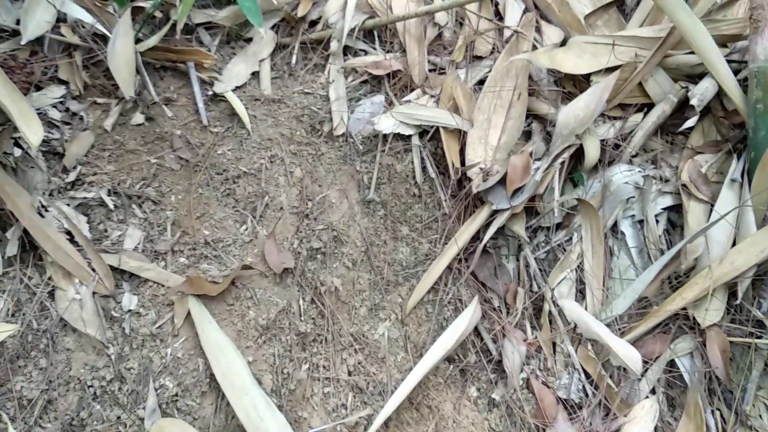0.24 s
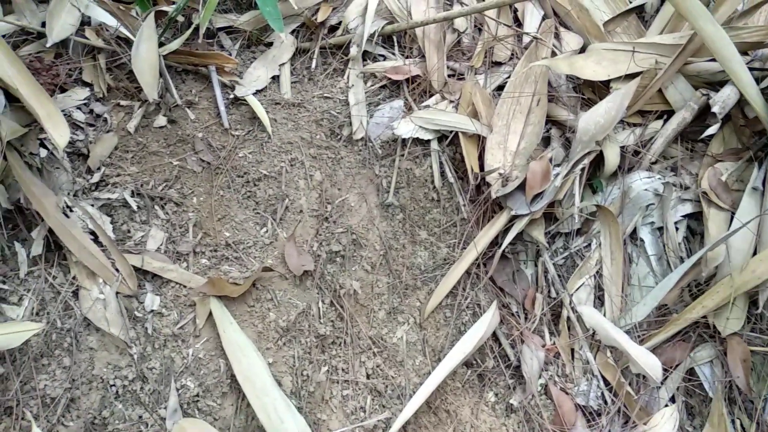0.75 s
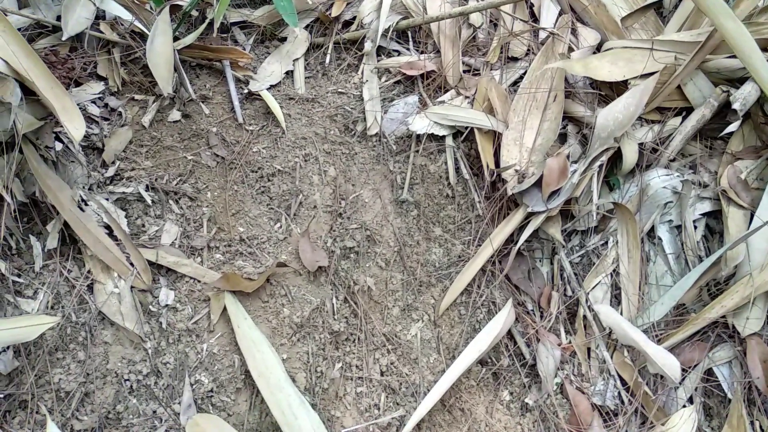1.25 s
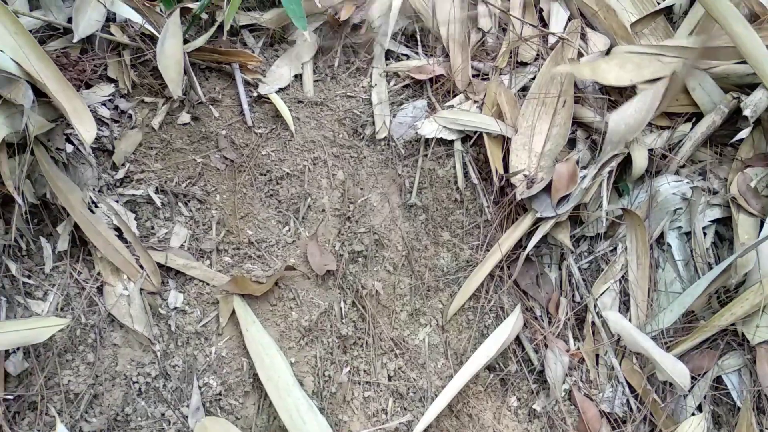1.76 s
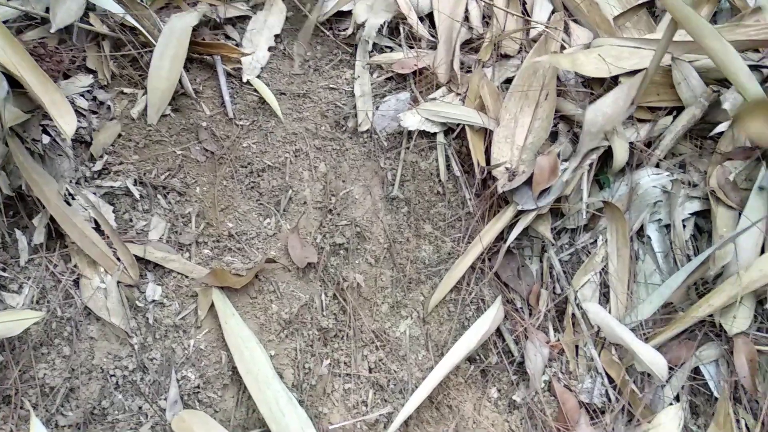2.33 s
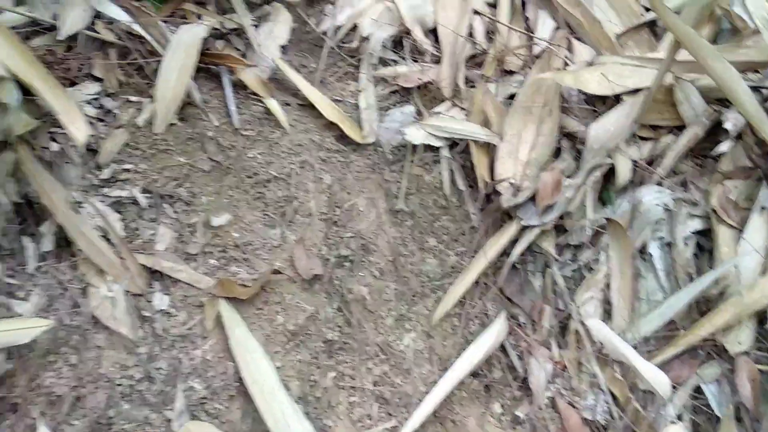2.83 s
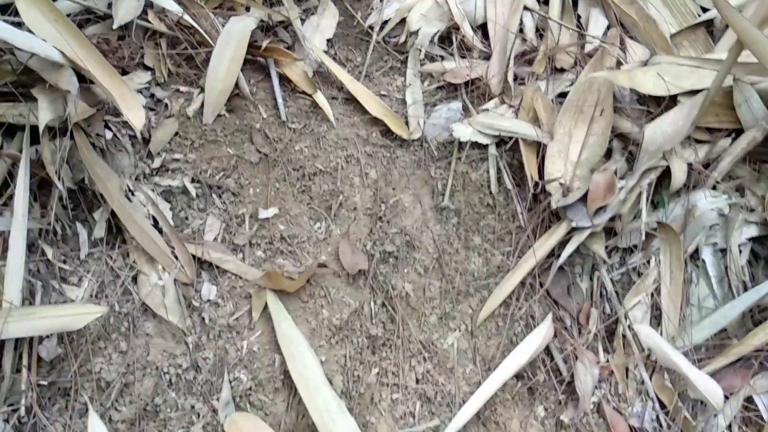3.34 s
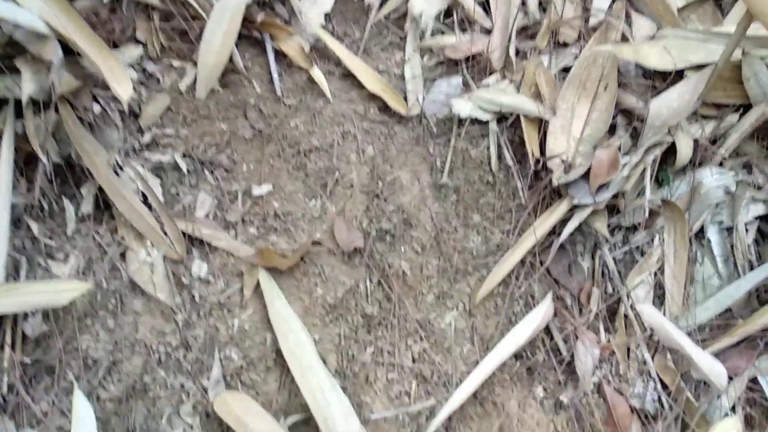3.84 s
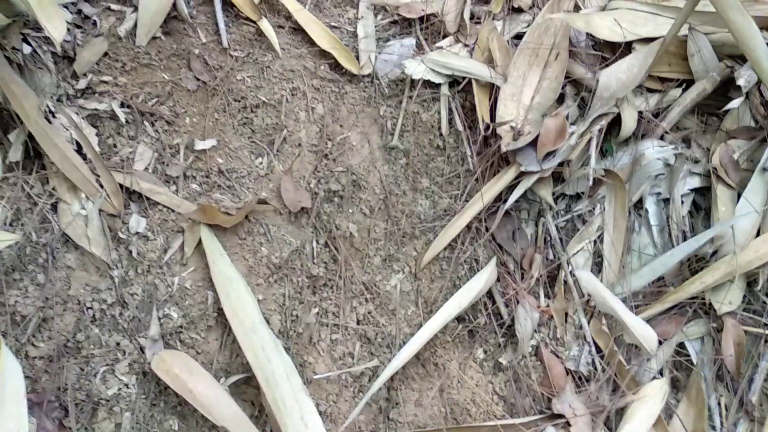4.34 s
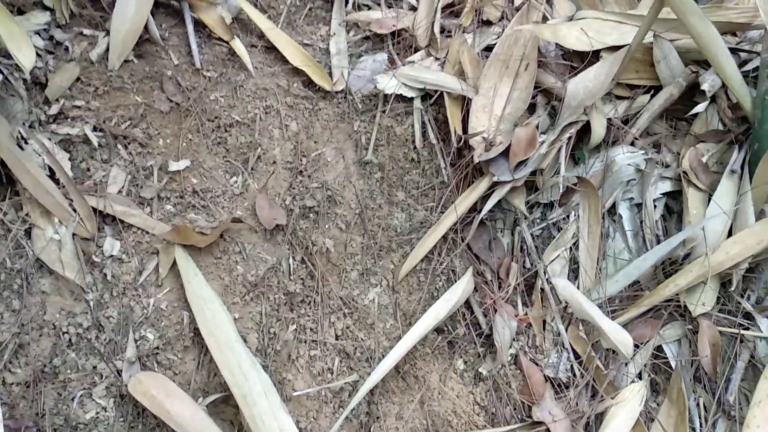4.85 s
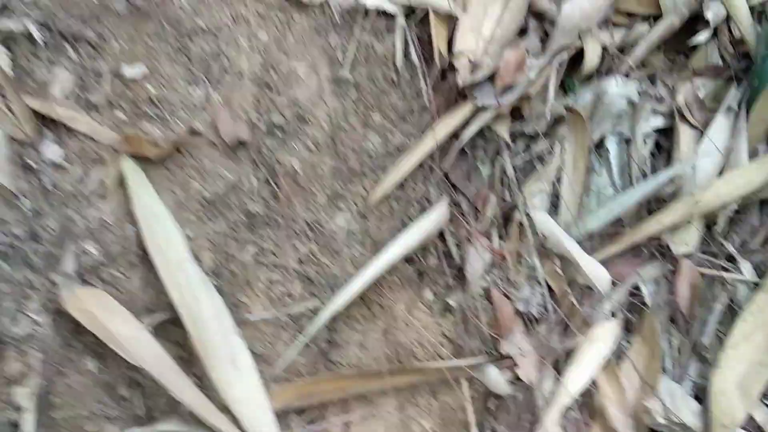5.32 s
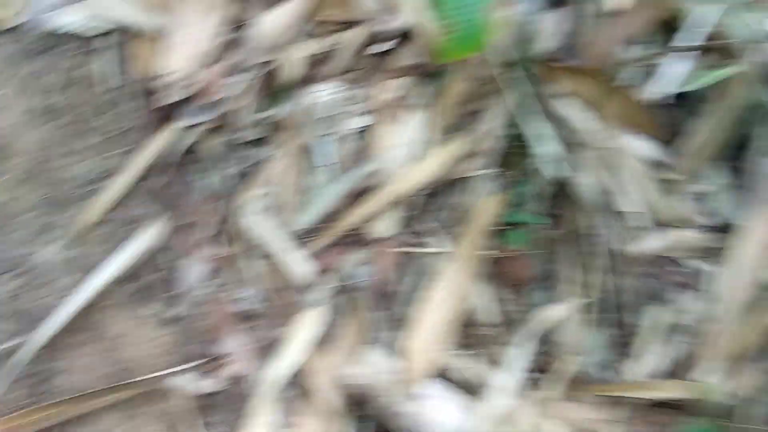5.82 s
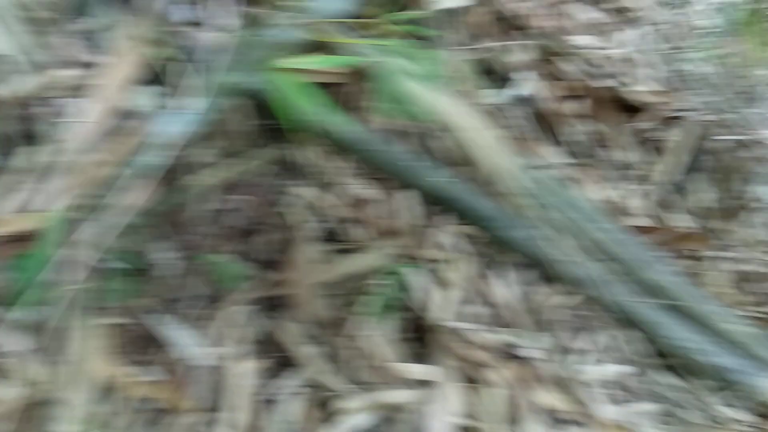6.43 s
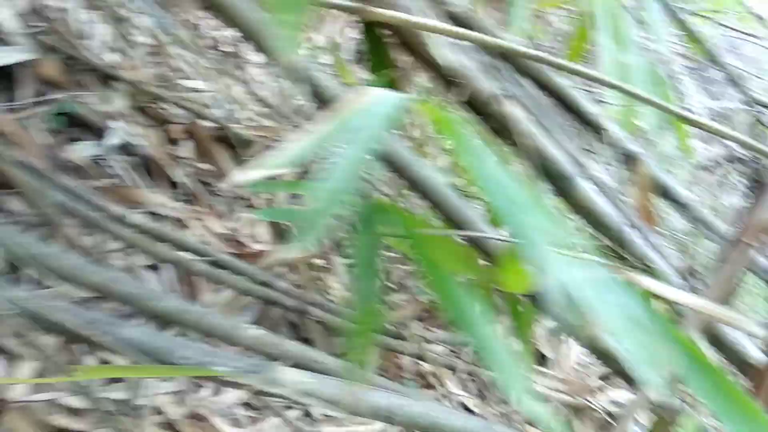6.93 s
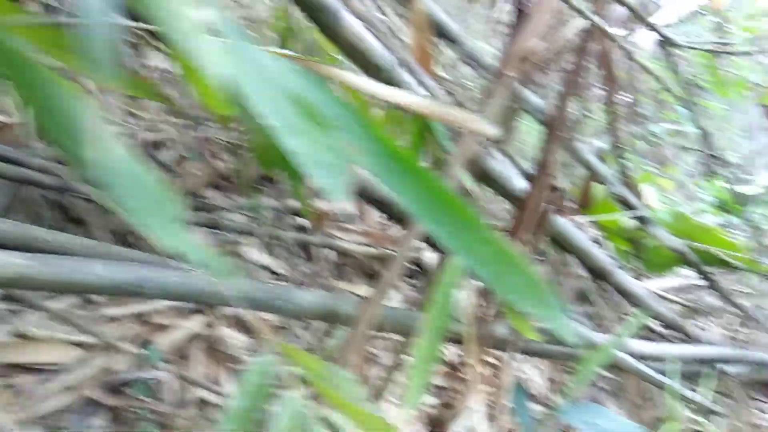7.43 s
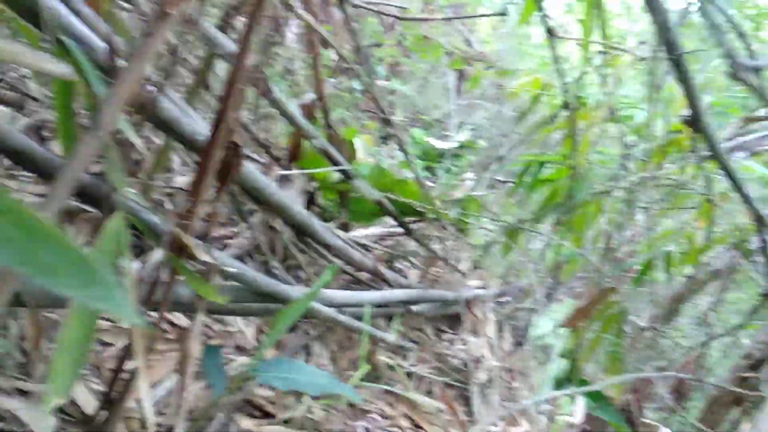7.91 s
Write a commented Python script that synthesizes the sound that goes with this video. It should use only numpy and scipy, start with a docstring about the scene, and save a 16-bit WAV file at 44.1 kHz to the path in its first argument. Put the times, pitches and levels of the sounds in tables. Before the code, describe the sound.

Close footsteps crunch dry leaf litter in a bamboo grove, about three a second, each with a dull thud underneath. The steps turn into shuffling, with waves of crackly leaf hiss and small ticks. A burst of snaps and a short handling bump on the handheld microphone follow, and then softer swishing through the leaves continues. A low rumble from far away sits quietly beneath everything.

```python
"""Footsteps in a bamboo grove

Feet stamp and shuffle in dry leaf litter, close to a handheld camera with two microphone ports.
Pushed leaves hiss and crackle; soles crunch them and thud on the hollow litter beneath.
Fingers bump the camera body, and a low rumble from far off lies under it all."""
import sys
import numpy as np
from scipy import signal
from scipy.fft import rfft, irfft, next_fast_len
from scipy.io import wavfile
from scipy.ndimage import uniform_filter1d, map_coordinates

SR = 44100
rng = np.random.default_rng(int(sys.argv[2]) if len(sys.argv) > 2 else 0)


def materialize(psi):
    """Save the field psi as 16-bit PCM at rate SR to the path in sys.argv[1].

    A 1-D psi becomes a single channel; in a 2-D psi each row is a channel.
    """
    bounded = np.clip(np.atleast_2d(psi).T, -1, 1)
    quanta = np.round(bounded * 32767).astype(np.int16)
    wavfile.write(sys.argv[1], SR, quanta)


N = 360297


def amp(db):
    """Decibels to gain."""
    return 10 ** (np.asarray(db) / 20)


def unit(x):
    """x at rms 1."""
    return x / np.sqrt(np.mean(x ** 2) + 1e-20)


def along(points, hz):
    """(Hz, value) points read on a log axis."""
    f, v = np.transpose(points)
    return np.interp(np.log(hz + 1), np.log(f + 1), v)


def curves(rows):
    """One value per sample for each column after the time."""
    s, *cols = np.transpose(rows)
    return [np.interp(np.arange(N) / SR, s, c) for c in cols]


def wobble(rate):
    """A smooth random curve, rate knots a second."""
    return map_coordinates(rng.standard_normal(int(N * rate / SR) + 4), [np.arange(N) * rate / SR])


def filtered(x, response):
    """x shaped by a frequency response."""
    m = next_fast_len(x.shape[-1] + 4096)
    return irfft(rfft(x, m) * response(np.fft.rfftfreq(m, 1 / SR)), m)[..., :x.shape[-1]]


def panned(db):
    """Gains of the two ports for a left-right difference."""
    return amp(np.array([db / 2, -db / 2]))


# How alike the two microphone ports hear the grove: (frequency [Hz], correlation [0..1])
PORT_LIKENESS = [(60, 0.96), (300, 0.96), (700, 0.72), (1500, 0.49), (3000, 0.24), (8000, 0.021)]

def ports(pair, spectrum):
    """Two unrelated signals coloured and mixed, alike in the bass and apart in the treble; rms 1."""
    def response(hz):
        angle = np.arccos(np.clip(along(PORT_LIKENESS, hz), -1, 1)) / 2
        return amp(along(spectrum, hz)) * [np.cos(angle), np.sin(angle)]
    mid, side = filtered(pair, response)
    return unit(np.array([mid + side, mid - side]))


def crackly(grain_share, per_second, spread_db, ring_s, patchy_db):
    """Two channels of patchy noise and tiny leaf fractures, each ringing briefly at its own pitch."""
    spectra = signal.stft(rng.standard_normal((2, N)), nperseg=256)[2]
    patches = uniform_filter1d(rng.standard_normal(spectra.shape[1:]), size=8, axis=0)
    patches = uniform_filter1d(patches, size=6, axis=1)
    noise = signal.istft(spectra * amp(patchy_db * unit(patches)), nperseg=256)[1][:, :N]
    count = int(per_second * N / SR)
    when, pitch, size, *phases = rng.random((20000, 5))[:count].T[..., None]
    start, age = (when * N).astype(int), np.arange(160)
    # sizes are very uneven, and neighbours in time are loud or soft together
    level_db = np.minimum(-spread_db * np.log(size) + 2.5 * wobble(40)[start], 11)
    decay = amp(level_db) * np.exp(-age / (ring_s * SR))
    grains = [decay * np.sin(np.pi * (pitch * age + 2 * phase)) for phase in phases]
    rattle = np.array([np.bincount((start + age).ravel(), g.ravel(), N)[:N] for g in grains])
    return np.sqrt(1 - grain_share) * unit(noise) + np.sqrt(grain_share) * unit(rattle)


# Feet pushing through the leaves close by:
# (loudest moment [s], level [dB], time to swell 10 dB [ms], time to fade 10 dB [ms])
PUSHES = [(0.0, -37.5, 57, 175), (0.209, -34.5, 16, 63), (0.265, -29.5, 7, 184), (0.596, -23.5, 31, 21.5),
          (0.713, -32.5, 63, 129), (0.87, -29.5, 44, 96), (1.044, -26.5, 16, 65), (1.222, -24.5, 24, 19),
          (1.679, -29, 16, 27), (1.795, -14, 22, 38), (1.86, -18.5, 85, 93), (2.046, -24.5, 41, 19),
          (2.15, -39, 157, 30), (2.314, -26, 102, 42), (2.385, -26.5, 35, 50), (2.546, -26, 84, 43),
          (2.66, -27, 119, 226), (3.13, -32.5, 27, 109), (3.354, -34, 125, 49), (3.758, -21, 141, 481),
          (4.027, -18, 237, 59), (4.21, -21, 36, 204), (4.507, -27.5, 379, 73), (4.7, -27.5, 119, 143),
          (4.863, -20, 185, 236), (5.291, -22.5, 44, 171), (5.44, -31, 470, 89), (5.596, -23, 21, 303),
          (5.921, -27, 139, 229), (6.268, -27, 164, 177), (6.617, -22.5, 179, 178), (6.985, -33, 30, 152),
          (7.133, -24, 210, 160), (7.434, -31.5, 54, 47), (7.527, -34.5, 27, 215), (8.055, -29.5, 160, 300)]
# Litter stirring between pushes: (time [s], level [dB])
STIRRING = [(0, -39), (1.3, -41), (2.2, -30.5), (3.2, -37), (5.1, -28.5), (6.4, -34), (8.17, -36)]

def footwork_db():
    """Hiss level: pushes swell and fade, crushed leaves settle, and their powers add to the stirring."""
    t = np.arange(0, N, 32) / SR
    s, db, swell_ms, fade_ms = np.transpose(PUSHES)[..., None]
    slope_ms = np.where(t < s, swell_ms, fade_ms)
    pushes = db - 10 * (1000 * abs(t - s) / slope_ms) ** 1.5  # power 1 is pointed, 2 a bell
    s, db = np.transpose(CRUSHES)[:2, :, None]
    settling = np.where(t < s, -120, db - 18.5 - 10 * (t - s) / 0.066)
    stirring = np.interp(t, *np.transpose(STIRRING))
    power = (amp(np.vstack([pushes, settling, stirring])) ** 2).sum(axis=0)
    return np.interp(np.arange(N) / SR, t, 10 * np.log10(power))


# Bright hiss of dry leaves near the microphone: (frequency [Hz], spectral density [dB])
HISS_SPECTRUM = [(1180, -27), (2000, -16.5), (2800, -10), (3600, -5), (5000, -2), (7000, -0.5), (10500, 1),
                 (12500, -3), (15000, -9), (16000, -4.5)]
# Dull body of the same rustle: (frequency [Hz], spectral density [dB])
BODY_SPECTRUM = [(150, -17), (250, -8), (500, -7.5), (1000, -5), (1800, -5), (3000, -2.5), (4500, -7.5),
                 (6600, -120)]
# Strength of that body when the hiss stands at -30 dB: (time [s], level [dB])
BODY_LEVEL = [(0, -38), (.8, -40.5), (1.5, -38), (1.85, -43.5), (2.1, -38), (2.4, -44.5), (3.3, -38),
              (3.6, -44.5), (3.85, -45.5), (4.4, -45), (5.3, -43.5), (5.6, -45.5), (6.1, -41.5), (6.8, -43),
              (7.2, -43.5), (8.17, -41.5)]
# The camera turning relative to the feet: (time [s], left port's lead [ms], hiss left-right [dB])
CAMERA_TURN = [(0, 0.26, 0.5), (1.9, 0.26, -1.5), (3.5, 0.32, 1), (4.2, 0.22, 0), (5.3, 0.27, 1.5),
               (5.6, 0.14, 0.5), (6.1, -0.25, -3.5), (6.6, -0.0064, 0.5), (7.1, -0.27, -5.5),
               (7.6, 0.074, -1.5), (8.17, 0.1, -1.5)]
FAR_RUSTLE_DB = -58

def shuffle():
    """Leaves slide over each other: a crackly hiss and a duller body, over faint rustle farther off."""
    hiss_db, pan_db = footwork_db(), curves(CAMERA_TURN)[1]
    body_db = curves(BODY_LEVEL)[0] + hiss_db + 30
    uneven_db = .7 * wobble(25) + .45 * wobble(70) + .35 * wobble(10)
    fine = crackly(grain_share=0.14, per_second=1200, spread_db=4, ring_s=0.0002, patchy_db=1.5)
    coarse = crackly(grain_share=0.1, per_second=1200, spread_db=3.7, ring_s=0.0006, patchy_db=2.1)
    hiss = amp(hiss_db + uneven_db) * ports(fine, HISS_SPECTRUM)
    body = np.hypot(amp(body_db + 1.2 * uneven_db), amp(FAR_RUSTLE_DB)) * ports(coarse, BODY_SPECTRUM)
    return hiss * panned(pan_db) * hush() + body


# Distant rumble, heard from inside the grove: (time [s], level [dB])
RUMBLE_LEVEL = [(0, -52), (1, -53), (2.2, -52), (2.9, -53.5), (3.3, -58), (4, -50.5), (4.8, -52),
                (5.5, -52), (6.2, -56.5), (7, -58), (8.17, -58)]
# Its colour: (frequency [Hz], spectral density [dB])
RUMBLE_SPECTRUM = [(40, -3), (62, -5), (85, 2), (130, 0.5), (240, -2.5), (400, -4), (650, -15), (1000, -28),
                   (1600, -120)]

def rumble():
    """Low, lumpy noise from far off."""
    level_db = curves(RUMBLE_LEVEL)[0] + 3.0 * wobble(38)
    return amp(level_db) * ports(rng.standard_normal((2, N)), RUMBLE_SPECTRUM)


# Leaves crushed together under a sole, close by:
# (time [s], level [dB], left-right [dB], t60 [s], tilt [dB/octave], ring [Hz])
CRUSHES = [(0.072, -11, 0, 0.081, -3.5, 8200), (0.4217, -7.5, 0, 0.093, -1.5, 10200),
           (0.613, -18.5, -12, 0.029, 1, 8900), (0.7264, -9, -3, 0.068, -1.5, 7900),
           (.979, -16.5, -4, 0.085, 3, 8000), (1.0405, -6, -1, 0.1, -2.5, 8260),
           (1.208, -18, 0, 0.062, -1, 11100), (1.373, -6.5, -3, 0.053, -3.5, 8100),
           (1.59, -16.5, -2, 0.053, 1, 7100), (1.7571, -4.5, -1.5, 0.051, -2, 8160),
           (1.78, -13, 2, 0.12, -4, 8100), (2.087, -8, 2, 0.093, -3, 6900),
           (2.296, -12.5, 1, 0.086, -1, 5470), (2.369, -14, -4, 0.03, 3, 6000),
           (2.525, -14, 0, 0.06, -4.5, 3440), (3.104, -14, 1, 0.023, -4.5, 4460),
           (3.336, -19, 3, 0.038, -4, 3300), (3.51, -24.5, -13, 0.042, -0.5, 6000),
           (4.636, -17.5, -18, .03, -0.5, 9100), (5.301, -12.5, 0, 0.013, -5, 4950),
           (5.356, -8.5, 1, .03, -2, 6460), (5.395, -8, 5, 0.081, 1, 6560),
           (5.4913, -5, 0, 0.0064, -6, 9700), (5.507, -15.5, -6, 0.05, -8.5, 3460),
           (5.545, -8.5, -3, 0.016, -3.5, 8800), (5.7368, -7.5, -2, 0.011, 3, 11200),
           (6.266, -18.5, -2, 0.012, -8.5, 2000), (6.975, -18, -17, .04, 10, 12000)]
# Single leaves ticking as they break: (time [s], level [dB])
LEAF_TICKS = [(0.067, -16), (0.933, -16), (1.603, -16), (1.767, -15), (1.978, -15), (1.988, -23),
              (2.113, -14), (2.389, -17), (2.997, -24), (3.122, -24), (4.52, -18), (5.041, -9.5),
              (5.19, -14), (5.273, -11), (5.442, -29), (5.594, -14), (5.927, -23), (7.525, -33),
              (7.587, -26)]
CREAK_DB, CREAK_S, TAIL_DB = -17, 0.006, -7  # levels relative to the crack; S is a time constant
RING_DB, RING_WIDTH_HZ, TICK_T60_S = 6, 790, 0.011

def crunch():
    """Leaves bend and creak, crack as the stiffest one rings, then dense fractures die away."""
    out, lead = np.zeros((2, N + SR)), SR // 40
    t = np.arange(-lead, SR // 4) / SR
    after = np.maximum(t, 0)
    creak = amp(CREAK_DB) * np.exp(-abs(t) / CREAK_S)
    ticks = [(s, db, 8 * side - 4, TICK_T60_S, -1, 3000 + 6000 * pitch)
             for (s, db), (side, pitch) in zip(LEAF_TICKS, rng.random((len(LEAF_TICKS), 2)))]
    # crushing adds mid tones and treble to the colour of the hiss
    spectrum = [(300, -26), (700, -13.5), (2000, -6.0)] + HISS_SPECTRUM[2:7] + [(16000, -3)]
    for s, db, pan_db, t60, tilt_db, ring_hz in CRUSHES + ticks:
        colour = [(hz, level + tilt_db * np.log2(hz / 6000)) for hz, level in spectrum]
        ragged = amp(1.24 * rng.standard_normal(len(t) // 49 + 1).repeat(49)[:len(t)])  # ~1 ms steps
        burst = ports(rng.standard_normal((2, len(t))) * ragged, colour)
        ringing = filtered(burst, lambda f: 1 + amp(RING_DB) / (1 + 2j * (f - ring_hz) / RING_WIDTH_HZ))
        rise = after / (.0009 + .02 * t60)  # 1 at the top of the crack
        crack = (rise * np.exp(1 - rise)) ** 2
        tail = amp(TAIL_DB - 60 * after / t60) * (1 - np.exp(-rise))
        crush = ringing * crack + burst * (tail + creak)
        rough_peak = 2.92 * np.std(crush[:, lead:lead + SR // 300])
        out[:, round(s * SR) - lead:][:, :len(t)] += amp(db) * panned(pan_db)[:, None] * crush / rough_peak
    return out[:, :N]


def ring(hz, t60, t):
    """A damped low swing with a soft start."""
    return np.sin(2 * np.pi * hz * t) * amp(-60 * t / t60) * (1 - np.exp(-t / 0.0042))


def puff(hz, t60, t):
    """Low noise around hz that dies after a blow, partly different at each port."""
    common, apart = rng.standard_normal((2, len(t)))
    pair = np.array([common + 0.099 * apart, common - 0.4 * apart])
    noise = filtered(pair, lambda f: f * hz / (hz * hz + f * f) / (1 + (f / hz / 2) ** 2))
    return unit(noise) * amp(-60 * t / t60) * (1 - np.exp(-t / 0.0032))


# Soles and heels landing near the camera: (time [s], relative level [dB], pitch [Hz])
FOOTFALLS = [(0.0722, -20.5, 230), (0.42, -18, 228), (0.584, -33.5, 219), (0.7249, -21, 232),
             (.859, -27.5, 240), (1.037, -21, 235), (1.185, -31.5, 237), (1.22, -37, 363),
             (1.372, -20, 221), (1.494, -34.5, 249), (1.759, -26.5, 220), (1.93, -32, 230),
             (1.982, -26.5, 450), (2.039, -25, 560), (2.639, -24.5, 1125), (3.159, -33, 525),
             (3.983, -32.5, 149), (4.515, -33.5, 222), (6.835, -36, 199), (7.02, -34.5, 420),
             (7.108, -36, 250), (7.353, -31, 260), (7.48, -40.5, 170)]
# Modes of the hollow litter underfoot: (pitch [ratio], level [dB], t60 [ratio])
LITTER_MODES = [(1, 0.5, 1), (1.55, -4.5, .8), (4.2, -3.5, .5)]

def thuds():
    """Litter and soil ring briefly under each sole, with a puff of low noise."""
    out, t = np.zeros((2, N + SR)), np.arange(SR // 3) / SR
    for s, db, hz in FOOTFALLS:
        t60 = 0.054 * (230 / hz) ** 0.29  # higher pitches die faster
        tone = sum(amp(level + rng.normal(0, 1)) * ring(hz * ratio, t60 * share, t)
                   for ratio, level, share in LITTER_MODES)
        start = round((s + .0025) * SR)  # the weight arrives a moment after first contact
        out[:, start:][:, :len(t)] += amp(db + 5.0) * (tone + 0.2 * puff(1.05 * hz, 2.6 * t60, t))
    return out[:, :N]


# Fingers shifting on the camera itself: (time [s], level [dB], pitch [Hz], t60 [s], left-right [dB])
FINGER_BUMPS = [(5.329, -20, 129, 0.024, 11), (5.364, -26, 87, 0.065, 20), (5.49, -14, 215, 0.041, 21),
                (5.492, 1.5, 740, 0.012, 5), (5.507, -22, 108, 0.069, 21), (5.584, -33.5, 196, 0.24, -16),
                (5.597, -14.5, 604, 0.034, -10.5)]

def handling_bumps():
    """Knocks carried through the camera body straight to the ports, rough with skin friction."""
    out, t = np.zeros((2, N + SR)), np.arange(SR // 3) / SR
    for s, db, hz, t60, pan_db in FINGER_BUMPS:
        knock = ring(hz, t60, t) + 0.24 * puff(1.04 * hz, 2.0 * t60, t)
        out[:, round(s * SR):][:, :len(t)] += amp(db) * panned(pan_db)[:, None] * knock
    return out[:, :N]


# Dips in the hiss just after two hard snaps: (time [s], left [dB], right [dB], recovery [s])
HISS_DIPS = [(5.497, -10, -4, 0.031), (5.551, -7, -8, 0.027)]

def hush():
    """Gain of the hiss at each port: a sudden drop, then a smooth return."""
    s, left_db, right_db, recovery_s = np.transpose(HISS_DIPS)[..., None]
    after = np.arange(N) / SR - s
    depth = (after > 0) * np.exp(-(after / recovery_s) ** 2)
    return amp([(left_db * depth).sum(axis=0), (right_db * depth).sum(axis=0)])


def scene():
    """Sound through the air reaches one port a little before the other as the camera turns."""
    air = shuffle() + crunch() + thuds() + rumble()
    half_lead = curves(CAMERA_TURN)[0] * SR / 2000  # samples
    at_ports = [map_coordinates(channel, [np.arange(N) + sign * half_lead], mode="nearest")
                for channel, sign in zip(air, (1, -1))]
    return np.array(at_ports) + handling_bumps()


# The hand on the camera colours the ports unequally: (frequency [Hz], left-right [dB])
HAND_SHADE = [(200, -1.5), (3000, 1.5), (8000, 0), (14000, -4.5)]
BASS_CUT_HZ, TOP_HZ = 76, 15900

def record(dry):
    """The hand shades the ports; the camera cuts deep bass steeply and all above its band limit."""
    def response(hz):
        f = hz / BASS_CUT_HZ
        highpass = (1j * f) ** 2 / (1 + .9j * f - f ** 2)
        return (hz < TOP_HZ) * panned(along(HAND_SHADE, hz)) * highpass ** 2
    return filtered(dry, response)


dry = scene()
out = record(dry)
materialize(out)
```